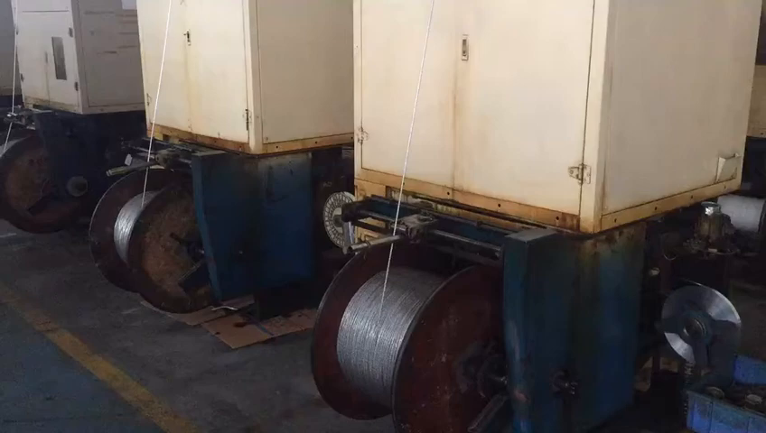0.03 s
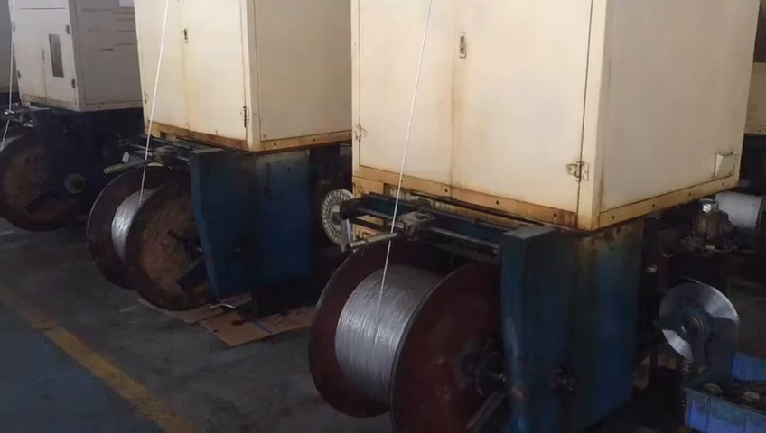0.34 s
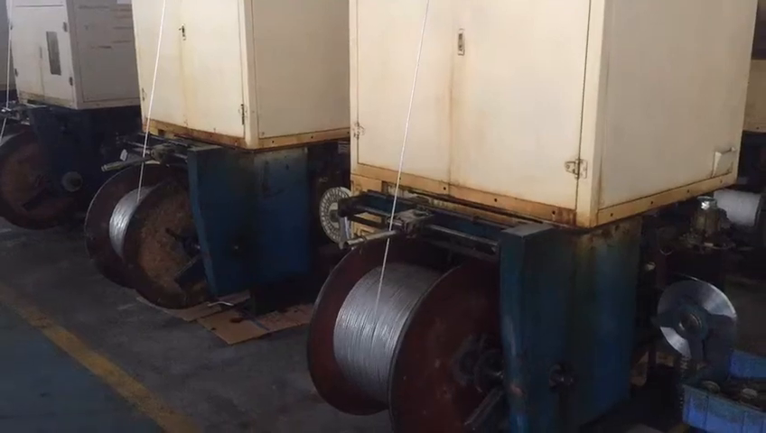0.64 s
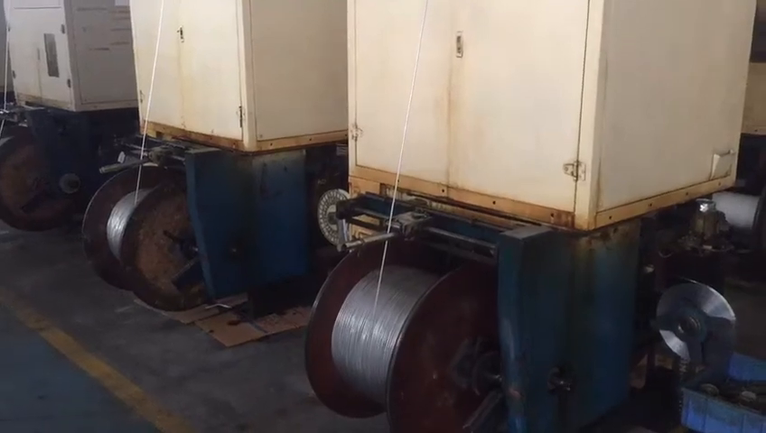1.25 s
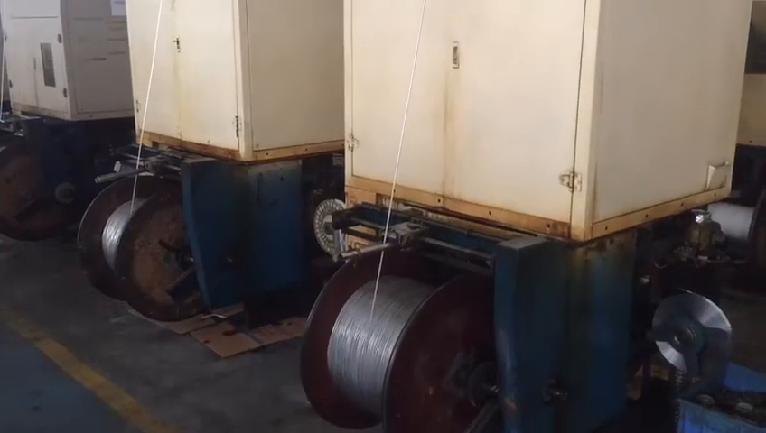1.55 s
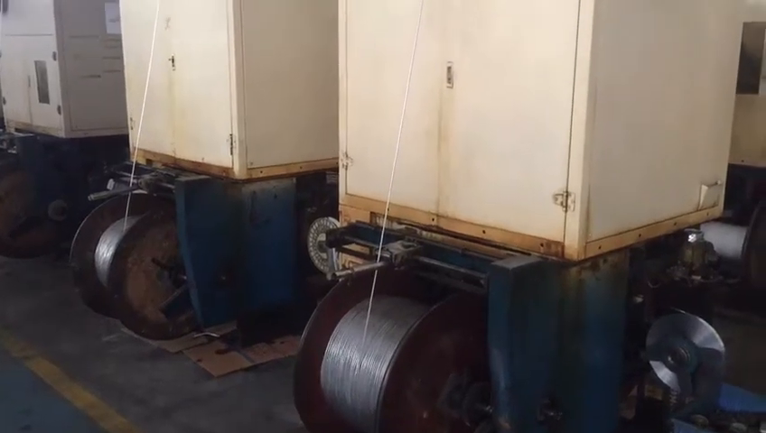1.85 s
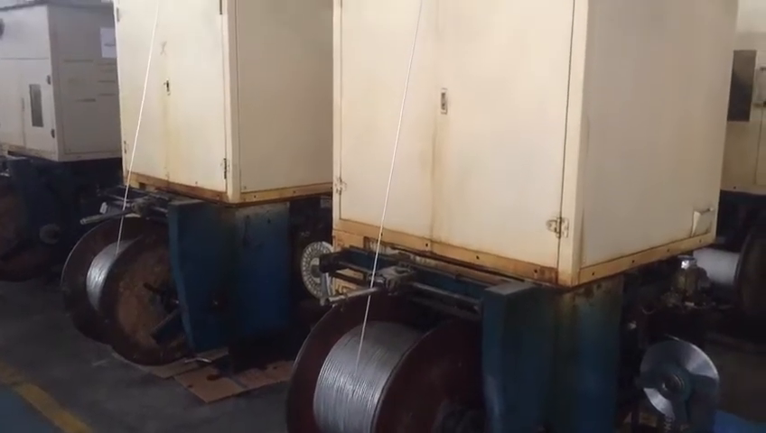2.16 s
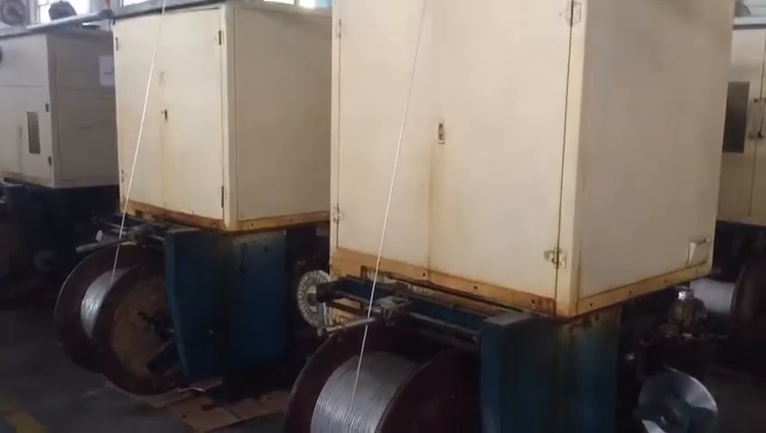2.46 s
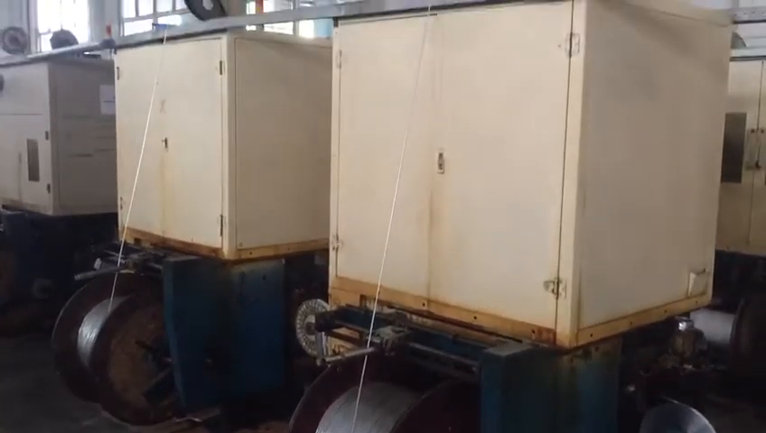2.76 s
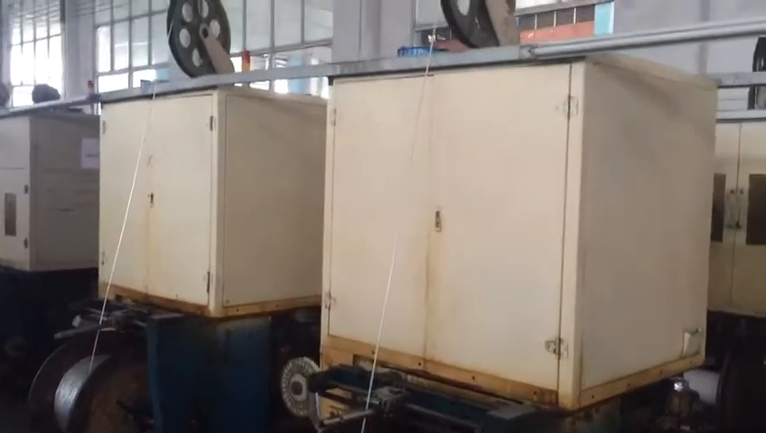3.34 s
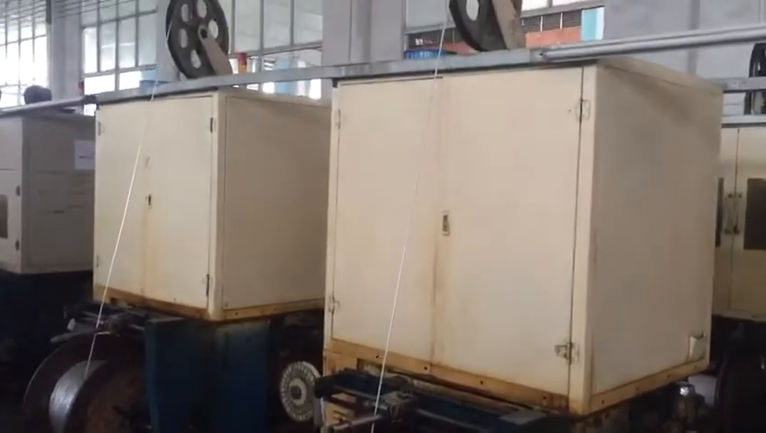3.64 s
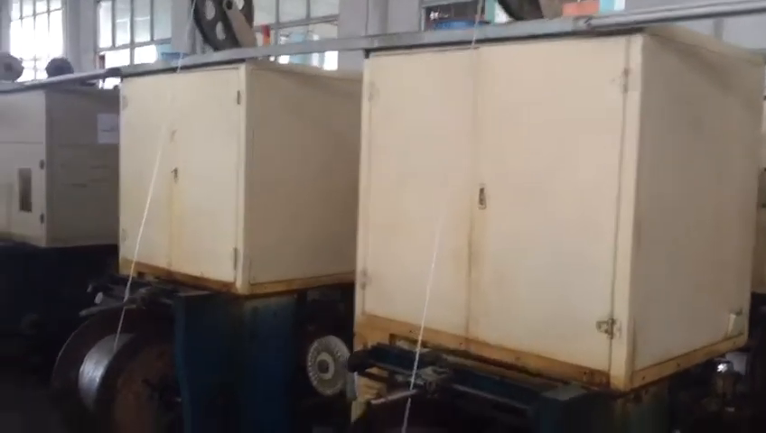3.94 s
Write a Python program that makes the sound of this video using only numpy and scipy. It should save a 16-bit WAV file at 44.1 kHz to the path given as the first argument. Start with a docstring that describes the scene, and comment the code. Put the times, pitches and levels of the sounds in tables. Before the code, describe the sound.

Wire braiding machines roar steadily in a factory hall, humming and clattering.

```python
"""A hall of wire braiding machines, heard beside one closed cabinet. At 0.12 s all cuts in: drives at
slightly different speeds hum and beat, bobbin carriers clatter round their tracks, gears whine faintly,
wire chafes over its guides and far machines merge into a roar. From 0.4 s frames knock dully.
A wire guide squeaks near 0.8 s and 1.2 s. From about 1.8 s the cabinet panels ring out in three swells."""
import sys
import numpy as np
from scipy import signal
from scipy.fft import rfft, irfft
from scipy.io import wavfile
from scipy.ndimage import uniform_filter1d

SR = 44100
rng = np.random.default_rng(int(sys.argv[2]) if len(sys.argv) > 2 else 0)


def waveform_to_disk(signal):
    """Save audio, clipped to [-1, 1], as 16-bit WAV at the path in sys.argv[1]."""
    frames = np.transpose(np.atleast_2d(signal))
    scaled = np.clip(frames, -1, 1) * 32767
    samples = np.round(scaled).astype(np.int16)
    wavfile.write(sys.argv[1], SR, samples)


N = 176400

# spectrum of the running steelwork: freq_hz, relative_db
STEEL_SPECTRUM = [(100, -29), (250, -1.5), (380, -0.5), (520, -2.16), (770, 0.4), (880, 1), (1300, -1.5),
                  (1700, 0), (2420, 0.5), (2750, -3), (3150, -5.5), (4050, -7), (4600, -9), (4920, -15.5),
                  (5300, -13.5), (7500, -20.5), (8300, -19.5), (9300, -21), (10400, -31.5), (11400, -26.5),
                  (14000, -35)]


def drives():
    """Close tones beat over a rumble; the drone swells as the drives fall into step, sags as they part."""
    # drive and panel hum: pitch_hz, relative_db
    hum_tones = [(66.9, -44), (69.8, -38.5), (73.1, -39), (101.7, -36.5), (102.9, -32), (108.8, -35),
                 (111.4, -36), (117.1, -42.5), (118.6, -32.5), (123.4, -31.5), (126.9, -31), (127.9, -35.5),
                 (133.9, -40), (137.0, -31.5), (156.5, -40), (167.2, -37), (191.2, -35.5), (205.5, -40),
                 (274.0, -43)]
    # frame and floor rumble: freq_hz, relative_db
    rumble_spectrum = [(20, -41), (40, -32), (54, -11.5), (70, -20), (78, -8), (98, -12), (120, 5.5),
                       (150, -5), (200, -4.5), (255, -6), (320, -15.5), (450, -31), (900, -66)]
    # drone swells and sags: middle_s, length_s, change_db
    beats = [(.23, 0.06, -7), (.272, 0.032, 6), (.468, 0.079, 3.5), (.588, 0.048, 2.5), (.70, 0.037, -3),
             (.818, 0.058, 1), (.934, 0.028, 2), (1.101, .04, 4), (1.2, 0.021, -5), (1.392, 0.1, 7),
             (1.842, 0.017, 4), (1.971, 0.042, 6), (2.026, .04, 5.5), (2.1, 0.077, -8), (2.175, 0.018, 5),
             (2.262, 0.032, 3.5), (2.32, 0.035, 2.5), (2.41, 0.033, -6), (2.564, 0.034, 7),
             (2.673, 0.039, 4.5), (2.715, 0.048, -12), (2.75, .035, 5), (2.835, 0.08, 3.5),
             (2.89, 0.033, -12), (2.995, 0.023, 4.5), (3.296, .07, 3), (3.389, 0.048, 4), (3.5, 0.039, -6),
             (3.655, 0.13, 3.5), (3.72, .04, -12), (3.772, 0.027, 3.5), (3.957, .05, 1.5)]
    # deep hum under the drone: time_s, level_db
    deep_level = [(.12, -29.5), (.7, -36), (.88, -31), (.97, -27), (1.17, -29), (1.3, -31), (1.65, -34),
                  (1.77, -29), (1.96, -34), (2.15, -30), (2.52, -31), (2.65, -28), (2.9, -31.5), (3.3, -33),
                  (4, -34)]
    drone_band_hz, in_step_hz, equal_mix_db = (99.7, 157), 123.4, 4
    hum = sum(amp(db) * np.sqrt(2) * np.sin(turns(hz + .12 * drift(2.1))) for hz, db in hum_tones)
    throb = amp(1.5) * hum + amp(-21.5) * colour(rng.standard_normal(N), rumble_spectrum)
    deep, bass = (below(throb, hz) for hz in drone_band_hz)
    swell_db = bumps(beats)
    # a swelling drone merges into one wavering tone
    merged_tone = np.sqrt(2) * np.sin(turns(in_step_hz + 6 * drift(12.13)))
    in_step = np.maximum(swell_db, 0) / equal_mix_db * merged_tone
    drone = amp(-21.5 + swell_db) * steadied(unit(bass - deep) + in_step, window_samples=900)
    drone = drone - below(drone, hz=81, order=12)
    deep_hum = amp(curve(deep_level)) * steadied(deep, window_samples=4000)
    overtones = amp(-1.35) * (throb - bass)
    return deep_hum + drone + overtones


def clatter():
    """Near machines, each at its own pace, ring into the hall and surge as carriers crowd past."""
    # near machines: handovers_per_s, relative_db, tilt_db_per_octave
    machines = [(21.745, 3, -4), (11.92, -2.5, -1), (20.55, -2, -1), (44.07, 0.5, 0), (31.86, -0.5, -1),
                (7.5, -8.5, 3.5), (102.93, 3, -1.5)]
    # clatter surges: middle_s, length_s, change_db
    surges = [(.56, .08, 1.8), (1.07, 0.086, 1.5), (1.23, 0.08, 3), (1.67, 0.068, 1), (1.84, .06, 2),
              (1.94, 0.045, 2.3), (2.2, 0.13, 1.7), (2.43, 0.11, 1.3), (2.98, 0.051, 0.5),
              (3.27, 0.17, 1.5), (3.79, .14, 1.9)]
    near = sum(amp(db) * colour(carriers(rate), STEEL_SPECTRUM, tilt) for rate, db, tilt in machines)
    return amp(-26.5 + bumps(surges)) * hall(near)


def carriers(rate_hz, count=24, t60_s=0.037, jitter_periods=.09, uneven_db=2):
    """One machine: carriers knock from horn gear to horn gear, each with its own short steel ring."""
    beat = np.arange(int(rate_hz * N / SR) + 1)
    slip, force = rng.standard_normal((len(beat), 2)).T
    hit_s = (beat + rng.random() + jitter_periods * slip) / rate_hz
    hit_sample = np.round(hit_s * SR).astype(int) % N
    hit_gain = amp(uneven_db * np.clip(force, -2, 2))
    t = np.arange(SR // 10) / SR
    out = np.zeros(N)
    for k in range(count):
        hits = np.bincount(hit_sample[k::count], hit_gain[k::count], N)
        ring = rng.standard_normal(len(t)) * np.exp(-np.log(1000) * t / t60_s)
        out += signal.oaconvolve(hits, ring)[:N]
    return out


def frame_knocks(rise_s=0.0023, detune_spread=0.049):
    """Each knock rings the low modes of a frame, tuned a little differently every time."""
    # dull knocks: start_s, relative_db
    knocks = [(.382, -11), (.496, -19), (0.583, -14.5), (.672, -17), (.94, -13.5), (1.362, -14),
              (1.521, -18), (1.593, -16), (1.925, -12), (1.986, -23), (2.128, -39), (2.326, -17),
              (2.407, -20), (2.864, -15), (3.04, -16.5), (3.328, -16), (3.823, -16.5)]
    # frame modes: pitch_hz, relative_db, t60_s
    modes = [(170, -3.5, 0.16), (205.5, -1.5, 0.1), (245, -5, 0.14), (317, -16, .08)]
    out, t = np.zeros(N), np.arange(SR // 4) / SR
    attack = 1 - np.exp(-t / rise_s)
    for start_s, knock_db in knocks:
        detune = 1 + detune_spread * rng.standard_normal(len(modes))
        ring = sum(amp(db - 60 * t / t60_s) * np.sin(2 * np.pi * hz * ratio * t)
                   for (hz, db, t60_s), ratio in zip(modes, detune))
        span = out[round(start_s * SR):][:len(t)]
        span += (amp(knock_db - 0.5) * attack * ring)[:len(span)]
    return out


def panels():
    """The cabinet's sheet steel rings, louder as the listener turns towards its top."""
    # panel resonances: pitch_hz, width_hz, relative_db
    modes = [(516, 90, -48.5), (869, 100, -43), (943, 160, -41)]
    # how strongly the panels are heard: time_s, gain_db
    prominence = [(.12, -12), (1.5, -19), (1.9, 1), (2.6, -7), (3.05, 5), (3.35, -2), (3.72, 6.5), (4, -14)]
    return amp(curve(prominence)) * ringing(modes)


def wire(surge_db=3, squeak_hz=5945, squeak_width_hz=110):
    """Wire hisses over the guides in small surges and gives two thin, scraping squeaks."""
    # chafing hiss: freq_hz, relative_db
    chafe_spectrum = [(1500, -23), (3500, 1), (5800, 4), (7500, -4.5), (9000, -8.5), (10400, -27),
                      (11500, -14), (14000, -18)]
    # guide squeaks: start_s, length_s, level_db
    squeaks = [(.77, .17, -47), (1.14, .11, -44.5)]
    t = np.arange(N) / SR
    chafe = amp(surge_db * drift(13.0)) * colour(rng.standard_normal(N), chafe_spectrum)
    squeak_gain = sum(amp(db) * np.sin(np.pi * np.clip((t - start_s) / length_s, 0, 1))
                      for start_s, length_s, db in squeaks)
    return amp(-41.5) * unit(chafe) + squeak_gain * ringing([(squeak_hz, squeak_width_hz, 0)])


def gears():
    """Meshing teeth whine faintly."""
    # gear whines: pitch_hz, width_hz, level_db
    whines = [(581, 9, -44), (620, 24, -47), (840, 26, -45), (2010, 24, -50), (2435, 40, -44.5),
              (3901, 7.8, -51), (5924, 30, -58)]
    return ringing(whines)


def far_roar(frame_samples=512, patchy_db=0.87, flutter_db=.5):
    """The clatter of distant machines, blurred to a faintly patchy wash."""
    spectra = signal.stft(rng.standard_normal(N), nperseg=frame_samples)[2]
    patches = uniform_filter1d(rng.standard_normal(spectra.shape), size=7, axis=0)
    patches = unit(uniform_filter1d(patches, size=14, axis=1))
    wash = signal.istft(spectra * amp(patchy_db * patches), nperseg=frame_samples)[1][:N]
    return amp(-25 + flutter_db * drift(24)) * colour(wash, STEEL_SPECTRUM)


def hall(x, t60_s=0.88, tail_db=1):
    """Adds the hall's diffuse tail; rms 1."""
    t = np.arange(SR) / SR
    tail = rng.standard_normal(SR) * np.exp(-np.log(1000) * t / t60_s)
    return unit(x + amp(tail_db) * signal.fftconvolve(x, tail / np.linalg.norm(tail))[:N])


def ringing(modes):
    """Narrow, unsteady resonances kept going by constant shaking."""
    out = np.zeros(N)
    for pitch_hz, width_hz, db in modes:
        angle = turns(pitch_hz)
        out += amp(db) * (drift(width_hz / 2) * np.cos(angle) + drift(width_hz / 2) * np.sin(angle))
    return out


def amp(db):
    """Decibels to gain."""
    return 10 ** (np.asarray(db) / 20)


def unit(x):
    """Scales to rms 1."""
    return x / np.sqrt(np.mean(x ** 2) + 1e-20)


def colour(x, spectrum, tilt_db_per_octave=0):
    """Filters by tilted (freq_hz, relative_db) points; rms 1."""
    octave = np.log2(np.fft.rfftfreq(N, 1 / SR) + 1)
    hz, db = np.transpose(spectrum)
    gain = amp(np.interp(octave, np.log2(hz), db) + tilt_db_per_octave * octave)
    return unit(irfft(rfft(x) * gain, N))


def drift(rate_hz):
    """Smooth random motion up to about rate_hz; rms 1."""
    f = np.fft.rfftfreq(2 * N, 1 / SR)
    return unit(irfft(rfft(rng.standard_normal(2 * N)) * np.exp(-(f / rate_hz) ** 2))[:N])


def turns(hz):
    """Running phase in radians, from a random start."""
    return 2 * np.pi * (np.cumsum(hz * np.ones(N)) / SR + rng.random())


def curve(points):
    """Joins (time_s, value) points by straight lines."""
    return np.interp(np.arange(N) / SR, *np.transpose(points))


def bumps(rows):
    """One Gaussian bump per row, summed."""
    t = np.arange(N) / SR
    return sum(height * np.exp(-(2 * (t - middle_s) / length_s) ** 2) for middle_s, length_s, height in rows)


def below(x, hz, order=24):
    """Zero-phase low-pass."""
    f = np.fft.rfftfreq(N, 1 / SR)
    return irfft(rfft(x) / (1 + (f / hz) ** order), N)


def steadied(x, window_samples, strength=0.78):
    """Partly evens out level changes slower than the window; rms 1."""
    power = uniform_filter1d(uniform_filter1d(x ** 2, window_samples), window_samples)
    return unit(x / (abs(power) + 1e-12) ** (strength / 2))


def scene():
    """All machines together, mono."""
    return (drives() + frame_knocks() + far_roar() + gears() + wire() + clatter() + panels())[None]


def record(dry):
    """The sound cuts in and is band-limited."""
    start_s, fade_s, cutoff_hz = 0.119, 0.0012, 14150
    gate = np.clip((np.arange(N) / SR - start_s) / fade_s, 0, 1)
    lowpass = signal.firwin(1023, cutoff_hz, window=("kaiser", 9), fs=SR)
    return signal.oaconvolve(dry * gate, lowpass[None], "same")


dry = scene()
out = record(dry)
waveform_to_disk(out)
```